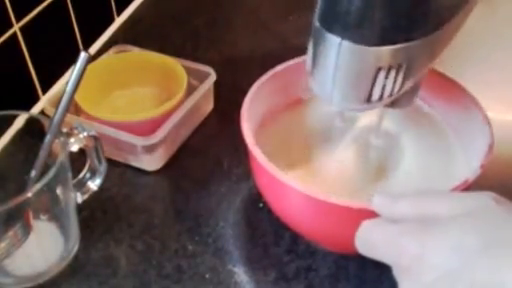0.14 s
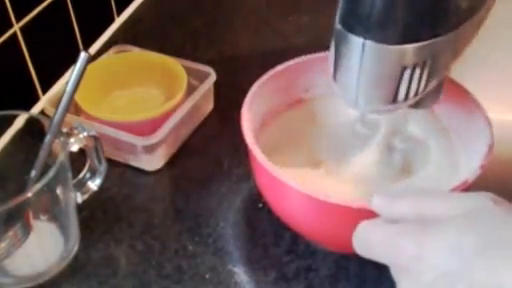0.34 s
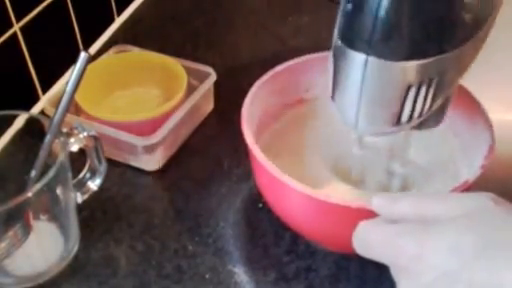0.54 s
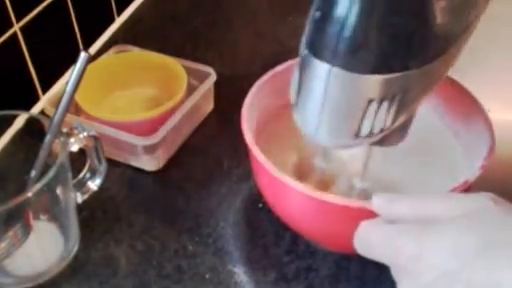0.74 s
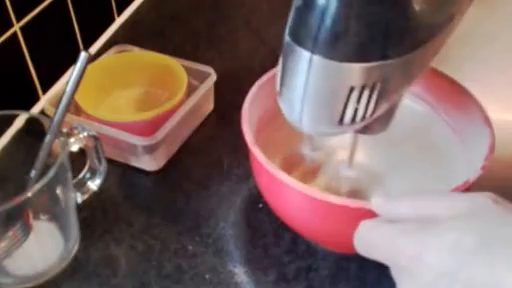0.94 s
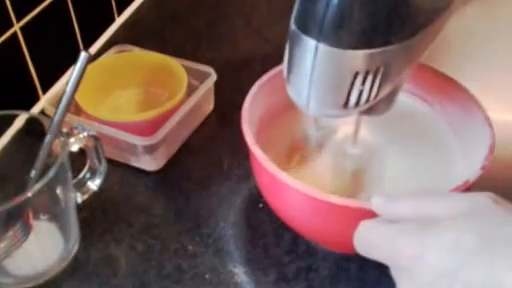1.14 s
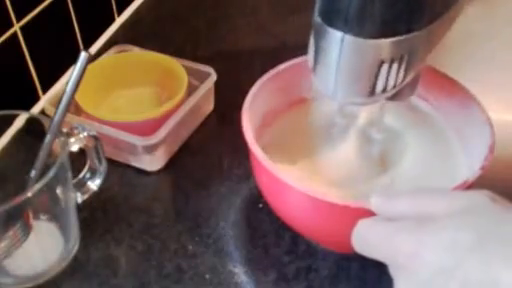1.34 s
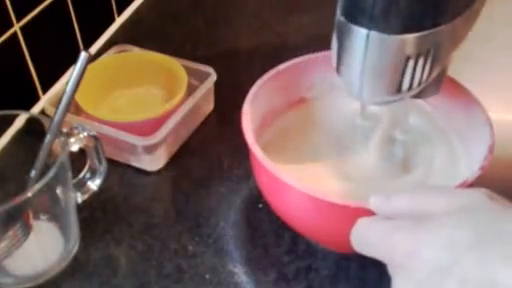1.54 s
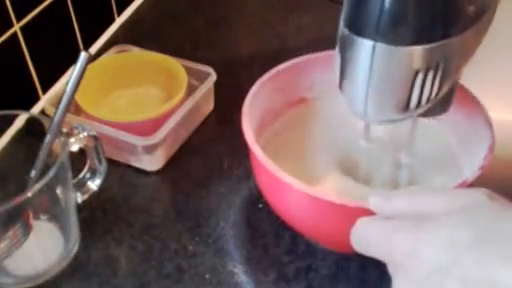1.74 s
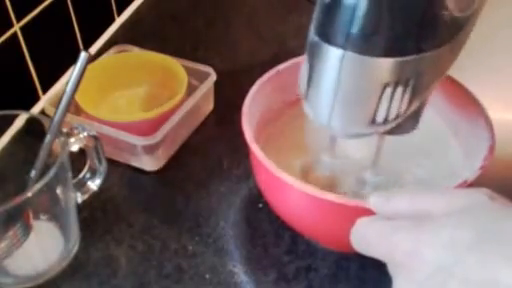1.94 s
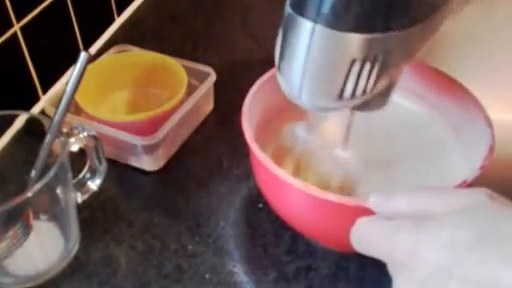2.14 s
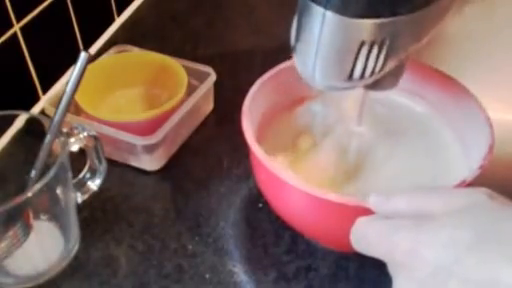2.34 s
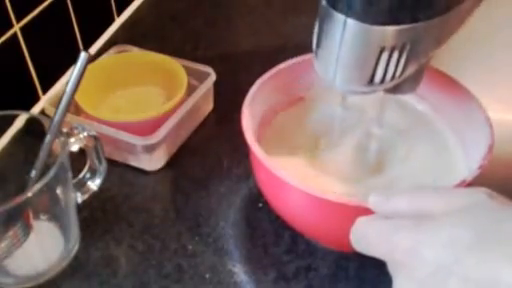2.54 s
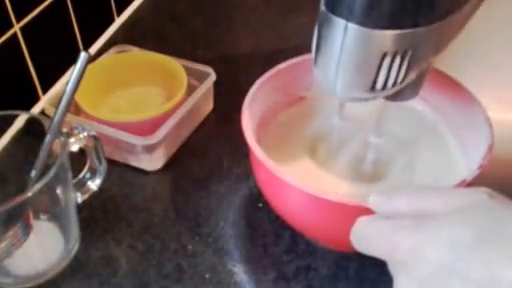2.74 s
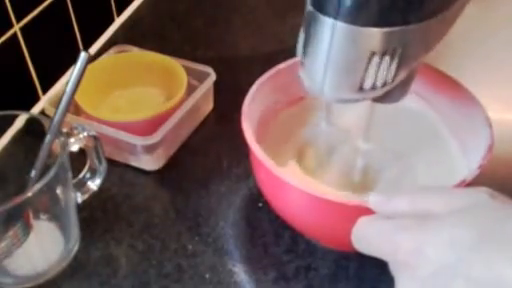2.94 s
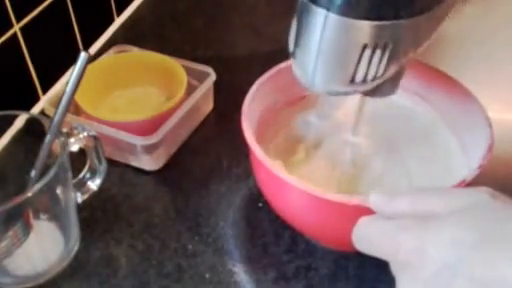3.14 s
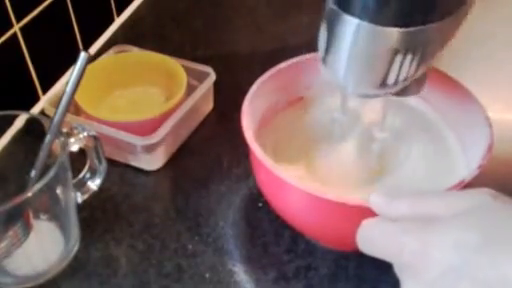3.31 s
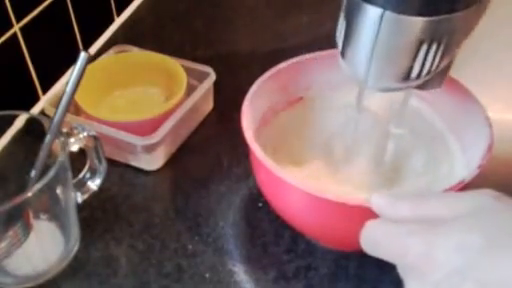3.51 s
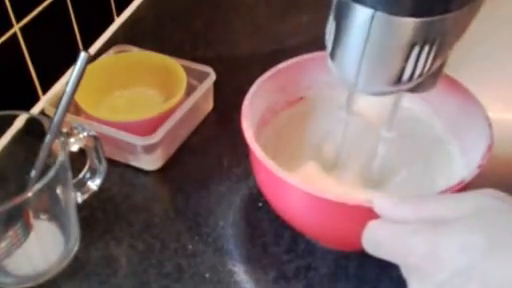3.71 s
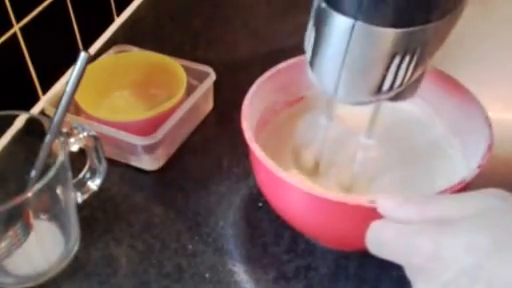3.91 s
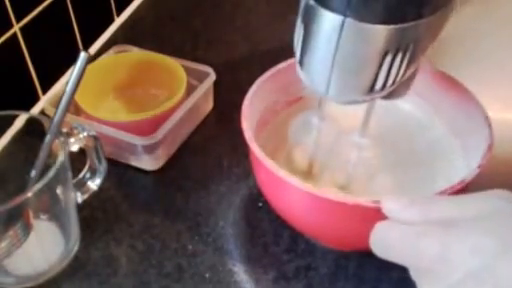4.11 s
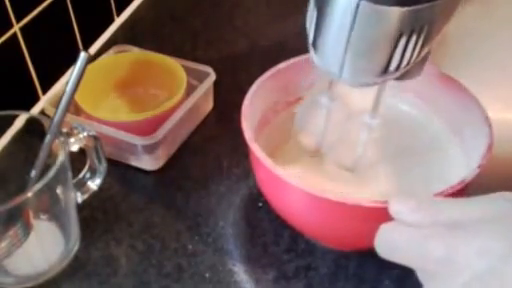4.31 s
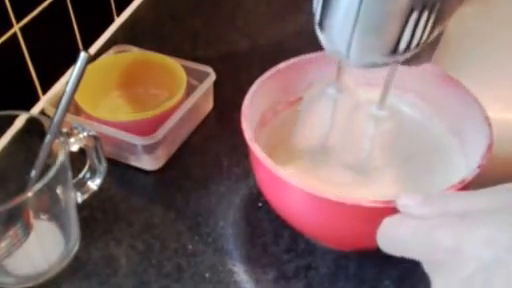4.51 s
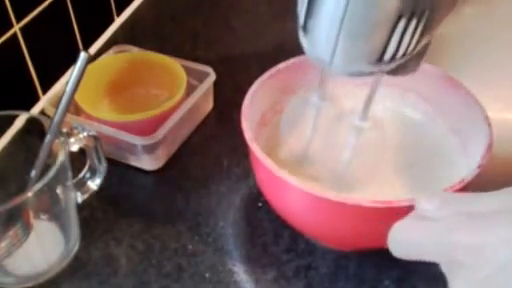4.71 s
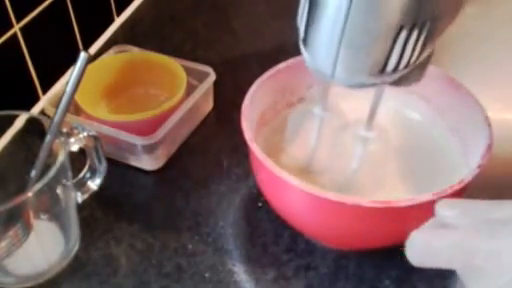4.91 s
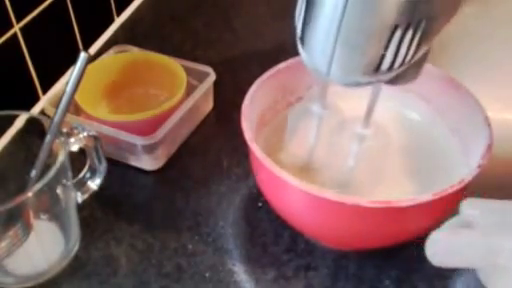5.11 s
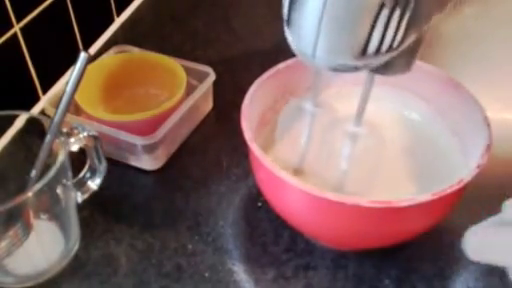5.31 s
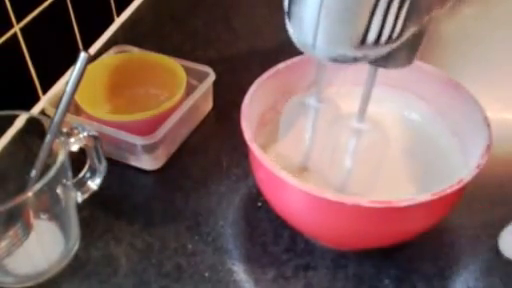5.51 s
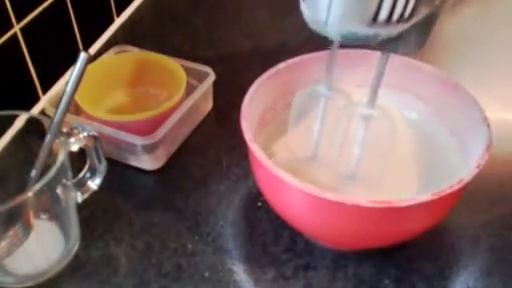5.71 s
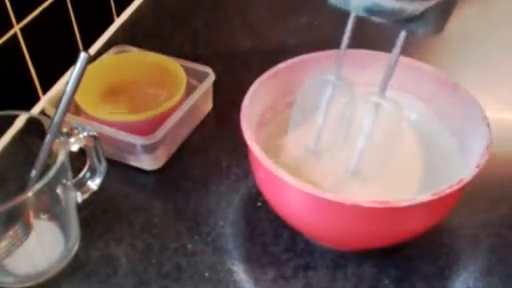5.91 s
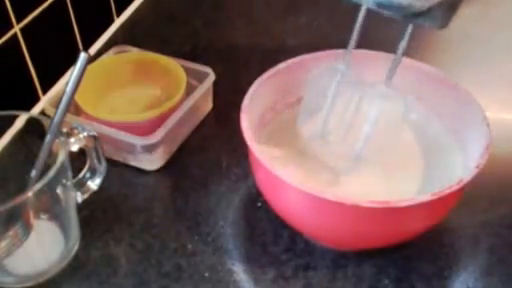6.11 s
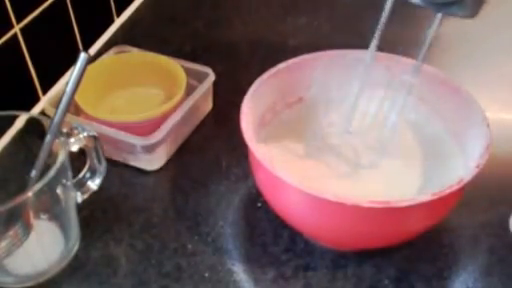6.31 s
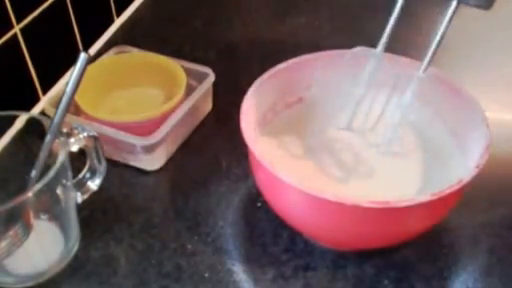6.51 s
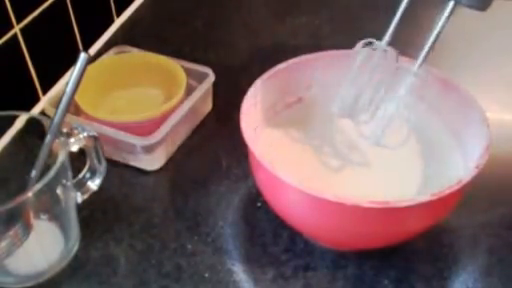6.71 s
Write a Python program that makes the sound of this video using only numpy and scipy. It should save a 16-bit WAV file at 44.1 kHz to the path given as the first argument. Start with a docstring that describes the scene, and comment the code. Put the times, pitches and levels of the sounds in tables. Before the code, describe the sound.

From the start an electric hand mixer is already running at full speed, close to the microphone in a small, hard-surfaced kitchen. A low motor hum around 310 Hz sits under a gritty bearing buzz, fast gear rattle, brush and fan hiss, and thick batter churning in a plastic bowl. The roar ripples with the turning beaters and swells with stirring strokes. At about 0.4 s a loose shaft clacks; from 0.75 to 1.0 s the beaters knock quickly and hollowly on the bowl, with more clacks near 1.3 and 1.6 s. The motor strains slightly higher around 2.3 s. Around 4 s the beaters lift, churning gets shallower, steel rings brighter and speed sags. At about 4.8 s power is cut: the whine slides steadily downward, free gears whir and slow, hiss fades first, a few weakening clacks follow, and by 6.5 s the mixer has nearly died into faint room hum.

```python
"""Small kitchen: an electric hand mixer whisks batter in a plastic bowl.
One rotor speed drives all its parts: sines make the hum, bearing buzz and commutator whine;
uneven impacts and noise through resonances make gear rattle, brush and fan hiss, and churning batter.
Beaters knock on the bowl, a loose shaft clacks, narrow bands of noise swell briefly. Lifted and switched
off, the mixer whines downwards as the rotor coasts, its gears whirring; faint room noise and hum stay."""
import sys
import numpy as np
from scipy import signal
from scipy.fft import rfft, irfft, next_fast_len
from scipy.io import wavfile
from scipy.ndimage import uniform_filter1d, minimum_filter1d, map_coordinates

SR = 44100
rng = np.random.default_rng(int(sys.argv[2]) if len(sys.argv) > 2 else 0)


def inscribe(sig):
    """Save sig as 16-bit PCM at rate SR to the path in sys.argv[1].

    A 1-D sig is mono; a 2-D sig holds one channel per row.
    Samples are clipped to [-1, 1] before scaling.
    """
    pcm = np.round(np.clip(np.atleast_2d(sig).T, -1, 1) * 32767)
    wavfile.write(sys.argv[1], SR, pcm.astype(np.int16))


N = 297675

# resonances of housing and bowl: centre_hz, width_hz, gain_db
BODY_MODES = [(587, 93, 6.5), (654.4, 19, 10), (800, 100, -0.5), (992, 64, 5.5), (1108, 140, 3.5),
              (1222, 410, 1), (1895, 130, 10.5), (2355, 250, 5), (2930, 210, 3.5), (4073, 540, 6.5),
              (4680, 310, 3.5), (5430, 630, 6.5), (6570, 450, 5.5), (7000, 590, 2), (7340, 1850, 6.5),
              (9070, 1300, 3.5)]
# narrow rings of gear cage and beater shafts: centre_hz, width_hz, gain_db
CAGE_MODES = [(1067, 22, 4), (1142, 20, 3), (1192, 24, 5), (1710, 35, 3), (1965, 34, 4.5), (2050, 28, 3),
              (2127, 30, 5), (2254, 26, 3), (2361, 22, 3.5), (2410, 22, 4.5), (2450, 30, 4.5),
              (2671, 45, 3.5), (2831, 45, 4), (2923, 28, 4)]
# force spectrum of churned batter: freq_hz, level_db
BATTER_SPECTRUM = [(30, -57), (85, -42), (130, -24.5), (180, -22.5), (270, -9.5), (380, 1.5), (600, -4.5),
                   (800, -5), (1200, -9.5), (3000, -65.5)]
# force spectrum of soft gear blows: freq_hz, level_db
SOFT_KNOCK_SPECTRUM = [(100, -102), (500, -33.5), (850, -2), (1100, -6.5), (1250, 9), (1400, 1), (1600, 5),
                       (1830, -3), (2300, -10), (3500, -32), (8000, -37)]
# force spectrum of hard gear blows: freq_hz, level_db
HARD_KNOCK_SPECTRUM = [(200, -52.5), (950, -23), (1300, 10.5), (1550, -11), (1780, -13.5), (2000, 3),
                       (2800, 1.5), (3400, -6), (5000, -20.5), (10000, -45)]
# force spectrum of brushes and fan: freq_hz, level_db
BRUSH_SPECTRUM = [(300, -70), (2000, -6), (3500, 0.5), (5000, -1.5), (6500, -12.5), (9000, -19),
                  (12500, -28.5), (14000, -46)]
# room noise spectrum: freq_hz, level_db
ROOM_SPECTRUM = [(20, -28), (45, -24), (80, -4), (130, -6), (200, -3), (300, -1.5), (600, -5), (1900, 6),
                 (4700, -11), (8100, -18.5), (13500, -24)]
# commutator tones: order (multiple of rotor speed), level_db (relative)
WHINE_ORDERS = [(24, -6.5), (36, -18), (48, -6.5), (72, -9.5)]
# beaters knocking on the bowl: start_s, level_db (relative)
BOWL_KNOCKS = [(0.743, -14), (0.804, -17), (0.823, -12), (0.846, -9), (0.871, -6), (0.904, -8.5),
               (0.941, -11), (0.96, -9), (1.007, -9.5)]
# modes of the struck bowl: pitch_hz, level_db (mean, relative), t60_s
BOWL_MODES = [(179, -25, 0.18), (498, 3.5, 0.061), (555, -10, 0.033), (1160, -16, .02)]
# a beater shaft jumping in its socket: start_s, level_db (peak before the band filter)
CLACKS = [(0.377, -6), (0.387, -6), (0.85, -7), (0.873, -6), (1.258, -5), (1.308, -6), (1.339, -7),
          (1.539, -5), (1.6, -5), (3.17, -7), (3.37, -8), (4.131, -7), (4.448, -7), (5.092, -9),
          (5.194, -11), (5.312, -14), (5.345, -13), (5.532, -17), (5.587, -15), (6.223, -28)]
# spectrum of one clack: freq_hz, gain_db
CLACK_SPECTRUM = [(200, -35), (700, -12), (1200, 0), (2500, 0), (3500, -9), (5500, -13), (12000, -42)]
# brief swells of narrow-band noise: centre_s, length_s, pitch_hz, level_db
SWELLS = [(0.39, 0.13, 1460, -20), (0.853, 0.11, 1720, -20.5), (0.903, 0.22, 522, -24.5),
          (0.975, 0.54, 4695, -26), (1.3, .12, 4330, -31), (1.6, 0.36, 1410, -22),
          (2.073, .11, 4580, -23.5), (2.227, 0.18, 4680, -24.5), (2.52, 0.4, 3380, -30.5),
          (3.378, 0.12, 2900, -22), (4.007, 0.13, 4540, -23), (4.172, 0.11, 4420, -27)]
# hum of a mains appliance: pitch_hz, level_db (rms)
MAINS_TONES = [(118.4, -74), (145.3, -69), (199.2, -62), (247.6, -69)]
# rotor under power up to the switch-off: time_s, speed_hz (before waver)
ROTOR_SPEED = [(0.05, 312.4), (0.42, 310.7), (1.5, 315.4), (2.35, 323.2), (2.9, 319), (3.5, 315.8),
               (3.82, 317), (4.4, 294.4), (4.77, 291.2)]
# bearing buzz: order (multiple of rotor speed), level_db (relative)
BUZZ_ORDERS = [(3, 4), (4, 1), (5, -4), (8, 1), (10, 0), (11, -2), (12, -8), (15, -6), (18, -10)]
# low modes of the steel beaters: centre_hz, width_hz, gain_db
STEEL_LOW_MODES = [(1085, 18, 6), (1113, 14, -16), (1706, 18, -11.5), (1920, 350, -5)]
# high modes of the beaters, scaled with the hard blows: centre_hz, width_hz, gain_db
STEEL_HIGH_MODES = [(2353, 10.3, 11), (2850, 95, -5), (2780, 37, -21), (4504, 110, -3)]
# resonances of the motor frame: centre_hz, width_hz, gain_db
FRAME_MODES = [(1220, 130, -5), (1400, 140, -4), (1600, 140, 1), (1850, 160, 2), (2700, 260, -7),
               (3100, 240, -7), (3650, 380, -2), (4250, 420, -3), (4900, 300, -7), (5450, 240, -6),
               (7000, 220, 6)]
# shell radiation of the buzz: freq_hz, gain_db
BUZZ_RADIATION = [(330, -22), (500, -7), (860, -12), (945, -10), (970, 5), (1010, -3), (1060, 8),
                  (1130, 10.5), (1165, 2), (1195, 3), (1240, -5), (1380, -4), (1460, 6), (1600, -8),
                  (1800, -12), (2360, -1.5), (2900, -1.5), (6500, -2)]
# air in the bowl: centre_hz, width_hz, gain_db
BOWL_AIR_MODES = [(656, 14, 0)]
# beaters standing out of the batter: time_s, lift (0 buried, 1 clear)
LIFT = [(0, 0.38), (1.7, .05), (2.25, 0.51), (2.75, 0.054), (3.4, 0.25), (4.1, 0.95), (5, 0.91)]
# once-a-turn hum, before slowing and wobble: time_s, level_db (rms)
SHAKE = [(0.08, -21), (0.4, -23), (1.1, -20.5), (2.05, -20), (2.3, -23.5), (2.9, -19), (3.95, -19.5),
         (4.55, -33.5), (4.95, -25)]
# stirring strokes: centre_s, length_s, churn_rise_db, rattle_rise_db (negative eases off)
STROKES = [(0.36, 0.11, 3.5, 0), (0.818, 0.62, 3.5, 1), (1.39, 0.099, 3.5, 1), (1.69, 0.69, 1.5, 1),
           (2.07, 0.34, 2.5, 0.5), (3.458, 0.097, -0.5, 0.5), (4.798, 1, -2.5, 0.5)]
# shell radiation of the twice-a-turn hum: freq_hz, gain_db
SECOND_RADIATION = [(200, -30), (285, -20), (310, 0), (335, -5), (375, 2), (415, 2), (430, -6), (452, 4),
                    (485, -7), (520, 3), (550, -6), (583, -2), (596, 7), (613, -5), (635, 1)]
# spectrum of the freely running gears: freq_hz, gain_db
WHIRR_SPECTRUM = [(1100, -12), (1600, -1), (2000, 1), (2800, -1), (3400, -6), (4600, -3), (5500, -7),
                  (7200, -13), (10000, -30)]

FULL_SPEED_HZ = 312
COAST_S, FRICTION_HZ_PER_S = 2.4, 78  # air-drag time constant; steady friction loss
GEAR_RATIO = 19  # rotor turns per beater turn
STIR_S = 1.1  # one round of the hand about the bowl

# *_DB: base level at full speed; *_POWER: power of the speed that its amplitude follows
# *_LIFT_DB: gain with the beaters clear
SHAKE_POWER = 7.3
SECOND_DB, SECOND_POWER = -38.5, 0.6
BUZZ_DB, BUZZ_POWER, BUZZ_LIFT_DB = -38.5, 2.7, 10
BATTER_DB, BATTER_POWER = -27.5, 1.14
FAN_DB, FAN_POWER, FAN_LIFT_DB = -21, 2.75, 0.13
BRUSH_DB, BRUSH_POWER = -39.5, 0.53
# rattle and whine hold their level down to the knee speed
RATTLE_DB, RATTLE_POWER, RATTLE_KNEE_HZ, RATTLE_LIFT_DB = -21.5, 3.07, 194, 1.53
WHINE_DB, WHINE_POWER, WHINE_KNEE_HZ = -46, 2.8, 50
WHIRR_DB, WHIRR_POWER, WHIRR_ATTACK_S = -27, 2.2, .15

HARD_DB, HARD_POWER, SOFTEST_DB = 6, 2.1, -6  # hard blows over soft ones; SOFTEST_DB is the floor before wobble
STROKE_SOFTENS = 0.23  # dB less hardness per dB of churning
RING_LOW_DB, RING_LOW_LIFT_DB, RING_LOW_POWER = -13, 14.5, -0.13
RING_HIGH_DB, RING_HIGH_LIFT_DB, RING_HIGH_POWER = -23.5, 22, 0.69
WORN_SHARE = .25  # power share of gear chatter that repeats each beater turn
DEPTH, DEPTH_PER_DB, DEPTH_LIFTED = 1, -0.04, 0.15  # deep share of churning; change per stroke dB; loss if lifted
PATCHY_DB = 1.0  # rms depth of the shifting colour
WHINE_FLUTTER_DB, WHINE_FLUTTER_KNOTS_PER_S = 2, 30
CLACK_T60_S = .016
SWELL_WIDTH_HZ = 180
TOP_HZ = 13850  # output band limit


def amp(db):
    """Decibels to gain."""
    return 10 ** (np.asarray(db) / 20)


def unit(x):
    """Scale to rms 1."""
    return x / np.sqrt(np.mean(x ** 2) + 1e-20)


def along(points, hz):
    """Interpolate (freq_hz, value) points on a log axis."""
    f, v = np.transpose(points)
    return np.interp(np.log(hz + 1), np.log(f + 1), v)


def curves(rows):
    """One value per sample for each column after the time."""
    s, *cols = np.transpose(rows)
    return [np.interp(np.arange(N) / SR, s, c) for c in cols]


def wobble(rate):
    """A smooth random curve, rate knots a second."""
    knots = rng.standard_normal(int(N * rate / SR) + 4)
    return map_coordinates(knots, [np.arange(N) * rate / SR])


def coloured(x, gain_db):
    """Causal minimum-phase filter; gain_db is a function of frequency."""
    m = 2 * next_fast_len(N // 2 + SR // 4)
    cepstrum = irfft(np.log(amp(gain_db(np.fft.rfftfreq(m, 1 / SR)))), m)
    # fold the cepstrum to its causal half
    cepstrum[1:m // 2] *= 2
    cepstrum[m // 2 + 1:] = 0
    return irfft(rfft(x, m) * np.exp(rfft(cepstrum)), m)[:N]


def ringing(x, modes):
    """x through parallel resonances: centre_hz, width_hz, gain_db."""
    m = next_fast_len(N + SR // 4)
    f = np.fft.rfftfreq(m, 1 / SR)
    response = sum(amp(db) * 1j * f * w / (c * c - f * f + 1j * f * w) for c, w, db in modes)
    return irfft(rfft(x, m) * response, m)[:N]


def housing(x, spectrum):
    """A force with its own spectrum rings housing and bowl; rms 1."""
    def gain_db(hz):
        modes_db = sum(db / (1 + (2 * (hz - c) / w) ** 2) for c, w, db in BODY_MODES + CAGE_MODES)
        return along(spectrum, hz) + modes_db
    return unit(coloured(x, gain_db))


def kitchen(x, t60, wet_db):
    """Direct sound plus the short answer of tiles and worktop, changing as the mixer moves; rms 1."""
    t = np.arange(SR // 2) / SR
    tails = rng.standard_normal((2, len(t))) * amp(-60 * t / t60) * (t > .002)
    here, there = signal.fftconvolve(x[None], tails / np.linalg.norm(tails[0]), axes=1)[:, :N]
    place = 2 * np.pi * np.arange(N) / SR / STIR_S
    return unit(x + amp(wet_db) * (np.cos(place) * here + np.sin(place) * there))


def shifting(x):
    """As the mixer moves about the bowl, patches of its spectrum come and go."""
    z = signal.stft(x, nperseg=512)[2]
    field = rng.standard_normal(z.shape)
    for _ in range(2):
        field = uniform_filter1d(field, size=3, axis=0)
        field = uniform_filter1d(field, size=24, axis=1)
    return signal.istft(z * amp(PATCHY_DB * unit(field)), nperseg=512)[1][:N]


def impacts(turns, scatter, spread_db):
    """One blow for each whole turn, loose in time and uneven in size; rms 1."""
    beats = np.arange(1, int(turns[-1]))
    late, size, sign = rng.standard_normal((len(beats), 3)).T
    at = np.interp(beats + scatter * late, turns, np.arange(N)).astype(int)
    blows = np.sign(sign) * amp(spread_db * np.clip(size, -2, 2))
    return unit(np.bincount(at, blows, N))


def slowing_db(hz):
    """Speed relative to full speed, in dB."""
    return 20 * np.log10(hz / FULL_SPEED_HZ)


def below_knee_db(hz, knee_hz, order=8):
    """0 dB at high speed; in proportion to the speed below the knee."""
    return -20 / order * np.log10(1 + (knee_hz / hz) ** order)


def rotor():
    """Speed in Hz and turns so far; the load makes it waver, and once off, drag and friction brake it."""
    coasting_s = np.maximum(np.arange(N) / SR - ROTOR_SPEED[-1][0], 0)
    brake_hz = FRICTION_HZ_PER_S * COAST_S
    steady_hz = (curves(ROTOR_SPEED)[0] + brake_hz) * np.exp(-coasting_s / COAST_S) - brake_hz
    hz = np.maximum(steady_hz, 1) * (1 + .002 * wobble(22))
    return hz, np.cumsum(hz) / SR


def beater_load(turns, depth_db, count=8):
    """The blades meet the batter in a slowly drifting pattern that repeats with each beater turn."""
    angle = 2 * np.pi * turns / GEAR_RATIO
    pattern = 0
    for k in range(1, count + 1):
        phase = rng.uniform(0, 2 * np.pi) + 0.089 * wobble(1.87)
        pattern = pattern + np.cos(k * angle + phase) / k ** 0.045
    return amp(depth_db * unit(pattern))


def stirring():
    """Change of churning and rattle in dB: one smooth swell or dip for each stroke."""
    t = np.arange(N) / SR
    return sum(np.outer(rises, np.exp(-(2 * (t - s) / length) ** 2)) for s, length, *rises in STROKES)


def background():
    """Faint room noise as coloured noise; the hum of a mains appliance as steady sines."""
    t = np.arange(N) / SR
    air = unit(coloured(rng.standard_normal(N), lambda f: along(ROOM_SPECTRUM, f)))
    mains = sum(np.sqrt(2) * amp(db) * np.sin(2 * np.pi * hz * t) for hz, db in MAINS_TONES)
    return amp(-48.5) * air + mains


def hum(hz, turns, lift):
    """The unbalanced rotor shakes the mixer once and twice a turn; its bearings add a fluttering buzz."""
    angle, slow_db = 2 * np.pi * turns, slowing_db(hz)
    first_db = curves(SHAKE)[0] + SHAKE_POWER * slow_db + 0.46 * wobble(24.96)
    first = amp(first_db) * np.sin(angle)
    second_db = SECOND_DB + SECOND_POWER * slow_db + 1.2 * wobble(7) + 1.5 * wobble(30)
    second = amp(second_db) * np.sin(2 * angle + 0.1 * wobble(35))
    second = coloured(second, lambda f: along(SECOND_RADIATION, f))
    buzz = sum(amp(db + 1.2 * wobble(14)) * np.sin(k * angle + .5 * wobble(35)) for k, db in BUZZ_ORDERS)
    buzz = coloured(buzz, lambda f: along(BUZZ_RADIATION, f))
    buzz_db = BUZZ_DB + BUZZ_LIFT_DB * lift + BUZZ_POWER * slow_db
    return np.sqrt(2) * (first + second) + amp(buzz_db) * buzz


def worn_teeth(turns, count=4):
    """Count teeth strike in each rotor turn; each has its own flaw, which returns with the gear wheel."""
    late, size = rng.standard_normal((2, count * GEAR_RATIO))
    beats = np.arange(1, int(count * turns[-1]))
    tooth = beats % len(size)
    at = np.interp((beats + .3 * late[tooth]) / count, turns, np.arange(N)).astype(int)
    return unit(np.bincount(at, size[tooth], N))


def gears(hz, turns, load, lift, stroke_db, strain_db):
    """Loose teeth and shafts chatter and ring the beaters; blows soften in thick batter and at low speed."""
    slow_db = slowing_db(hz)
    level_db = RATTLE_DB + strain_db + RATTLE_LIFT_DB * lift + 0.43 * wobble(7.8)
    level_db = level_db + RATTLE_POWER * below_knee_db(hz, RATTLE_KNEE_HZ)
    hardness_db = HARD_DB - STROKE_SOFTENS * stroke_db + HARD_POWER * slow_db
    hardness_db = np.maximum(hardness_db, SOFTEST_DB) + 0.23 * wobble(11)

    loose = impacts(4 * turns, scatter=.3, spread_db=4.5)
    teeth = np.sqrt(1 - WORN_SHARE) * loose + np.sqrt(WORN_SHARE) * worn_teeth(turns)
    teeth = teeth / np.sqrt(np.abs(hz) / hz.max())  # offset the sparser blows at low speed
    force = kitchen(load * (unit(teeth) + .5 * rng.standard_normal(N)), t60=0.27, wet_db=-10.0)
    soft = housing(force, SOFT_KNOCK_SPECTRUM)
    hard = housing(np.roll(force, SR // 500), HARD_KNOCK_SPECTRUM)  # 2 ms later

    low_gain = amp(RING_LOW_DB + RING_LOW_LIFT_DB * lift + RING_LOW_POWER * slow_db)
    high_gain = amp(RING_HIGH_DB + RING_HIGH_LIFT_DB * lift + RING_HIGH_POWER * slow_db)
    low_force = load * housing(rng.standard_normal(N), SOFT_KNOCK_SPECTRUM)
    high_force = load * housing(rng.standard_normal(N), BRUSH_SPECTRUM)
    low_ring = unit(ringing(low_force, STEEL_LOW_MODES))
    high_ring = unit(ringing(high_force, STEEL_HIGH_MODES))
    rattle = soft + low_gain * low_ring + amp(hardness_db) * (hard + high_gain * high_ring)
    return amp(level_db) * rattle / np.sqrt(1 + low_gain ** 2)


def brushes(hz, turns, load, lift):
    """Brushes scrape in a once-a-turn pulse and spark thrice a turn; the fan's rush dies away first."""
    slow_db = slowing_db(hz)
    scrape = rng.standard_normal(N) * (1 + 0.066 * np.cos(2 * np.pi * turns))
    sparks = impacts(3 * turns, scatter=.3, spread_db=-4.5)
    force = kitchen(load * (scrape + 0.5 * sparks), t60=0.068, wet_db=-8.5)
    fan_gain = amp(FAN_DB + FAN_LIFT_DB * lift + FAN_POWER * slow_db)
    brush_gain = amp(BRUSH_DB + BRUSH_POWER * slow_db)
    return np.hypot(fan_gain, brush_gain) * amp(0.22 * wobble(13)) * housing(force, BRUSH_SPECTRUM)


def whine(hz, turns):
    """Commutator bars sing at multiples of rotor speed, swelling as they sweep past frame resonances."""
    unsteady = turns + .005 * wobble(170)
    tone = 0
    for k, db in WHINE_ORDERS:
        gain = amp(db + WHINE_FLUTTER_DB * wobble(WHINE_FLUTTER_KNOTS_PER_S))
        tone = tone + gain * np.sin(2 * np.pi * k * unsteady + .2 * wobble(260))
    # the shell holds back the highest orders
    muffled = signal.sosfilt(signal.butter(4, 5400, fs=SR, output="sos"), tone)
    level_db = WHINE_DB + WHINE_POWER * below_knee_db(hz, WHINE_KNEE_HZ)
    return amp(level_db) * ringing(kitchen(muffled, t60=.25, wet_db=-9), FRAME_MODES)


def batter(hz, turns, load, lift, stroke_db):
    """Blades slap and churn the batter and sound the hollow of the bowl."""
    slaps = impacts(turns, scatter=0.592, spread_db=2.5)
    force = kitchen(load * (slaps + 0.96 * rng.standard_normal(N)), t60=0.37, wet_db=-3.0)
    deep = housing(force, BATTER_SPECTRUM) + amp(-8.5) * unit(ringing(force, BOWL_AIR_MODES))
    # a lifted, slowing blade only skims the batter, so the deep part dies first
    high_pass = signal.butter(3, 520, "high", fs=SR, output="sos")
    skim = housing(signal.sosfilt(high_pass, np.roll(force, SR // 10)), BATTER_SPECTRUM)
    depth = DEPTH + DEPTH_PER_DB * stroke_db - DEPTH_LIFTED * lift
    depth = np.clip(depth * hz / FULL_SPEED_HZ, 0, 1)
    level_db = BATTER_DB + stroke_db + BATTER_POWER * slowing_db(hz)
    return amp(level_db) * (depth * deep + np.sqrt(1 - depth ** 2) * skim)


def clacks():
    """Single hard blows of a loose shaft: short decaying noise bursts."""
    out, t = np.zeros(N), np.arange(SR // 20) / SR
    gain = amp(along(CLACK_SPECTRUM, np.fft.rfftfreq(4096, 1 / SR)))
    for s, db in CLACKS:
        burst = rng.standard_normal(len(t)) * amp(-60 * t / CLACK_T60_S)
        blow = irfft(rfft(burst, 4096) * gain)[:len(t)]
        out[round(s * SR):][:len(t)] += amp(db) * blow / np.abs(blow).max()
    # thin steel radiates no bass
    return signal.sosfilt(signal.butter(3, [500, 8000], "band", fs=SR, output="sos"), out)


def swells():
    """Narrow bands of noise swell and fade briefly, each at its own pitch."""
    out, t = np.zeros(N), np.arange(N) / SR
    for s, length, hz, db in SWELLS:
        band_hz = [hz - SWELL_WIDTH_HZ / 2, hz + SWELL_WIDTH_HZ / 2]
        band = signal.butter(2, band_hz, "band", fs=SR, output="sos")
        envelope = np.exp(-(2 * (t - s) / length) ** 2)
        out += amp(db) * envelope * unit(signal.sosfilt(band, rng.standard_normal(N)))
    return out


def bowl():
    """The beaters knock on the plastic wall; its damped modes give short hollow knocks."""
    out, t = np.zeros(N), np.arange(SR // 5) / SR
    onset = 1 - np.exp(-t / 0.00035)
    for s, db in BOWL_KNOCKS:
        ring = 0
        for hz, level_db, t60 in BOWL_MODES:
            decay = amp(level_db + rng.normal(0, 2.7) - 60 * t / t60)
            ring = ring + decay * np.sin(2 * np.pi * hz * t)
        out[round(s * SR):][:len(t)] += amp(db - 6.0) * ring * onset
    # a small bowl radiates no bass
    return signal.sosfilt(signal.butter(3, 170, "high", fs=SR, output="sos"), out)


def whirr(hz, turns, count=40):
    """With the power off, unloaded gears run freely and sound a comb of fine, flickering overtones."""
    comb = 0
    for k in range(7, count):
        comb = comb + amp(3 * wobble(14)) * np.sin(2 * np.pi * (k * turns + rng.uniform()))
    comb = unit(coloured(comb, lambda f: along(WHIRR_SPECTRUM, f)))
    coasting = np.clip((np.arange(N) / SR - ROTOR_SPEED[-1][0]) / WHIRR_ATTACK_S, 0, 1)
    return coasting * amp(WHIRR_DB + WHIRR_POWER * slowing_db(hz)) * comb


def scene():
    """One rotor drives every part of the mixer; the hand stirs and lifts it."""
    hz, turns = rotor()
    load, lift = beater_load(turns, depth_db=1.0), curves(LIFT)[0]
    stroke_db, strain_db = stirring()
    rattle = gears(hz, turns, load, lift, stroke_db, strain_db)
    roar = shifting(rattle + brushes(hz, turns, load, lift))
    mixer = hum(hz, turns, lift) + roar + whirr(hz, turns) + whine(hz, turns) + clacks() + swells()
    return (mixer + batter(hz, turns, load, lift, stroke_db) + bowl() + background())[None]


def record(dry, target_db=-14.0, ceiling=.87):
    """Compress 2:1 above the target level, duck under the highest peaks, cut all above the band limit."""
    loudness = np.sqrt(np.abs(uniform_filter1d(dry ** 2, size=SR // 6)) + 1e-12)
    even = dry * np.sqrt(np.minimum(amp(target_db) / loudness, 1))
    needed = ceiling / np.maximum(np.abs(even), ceiling)
    duck = uniform_filter1d(minimum_filter1d(needed, size=SR // 100), size=SR // 100)
    m = next_fast_len(N + SR // 4)
    passband = np.fft.rfftfreq(m, 1 / SR) < TOP_HZ
    return irfft(rfft(even * duck, m) * passband, m)[..., :N]


dry = scene()
out = record(dry)
inscribe(out)
```